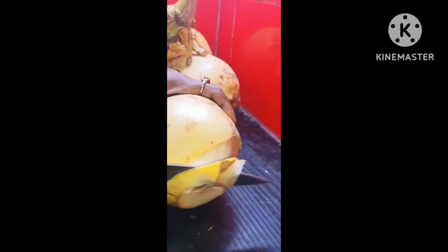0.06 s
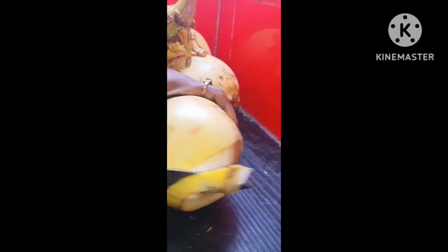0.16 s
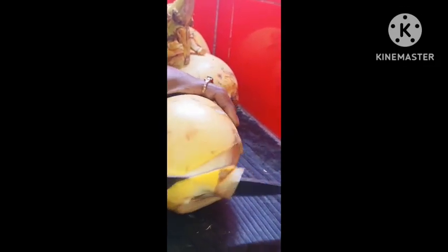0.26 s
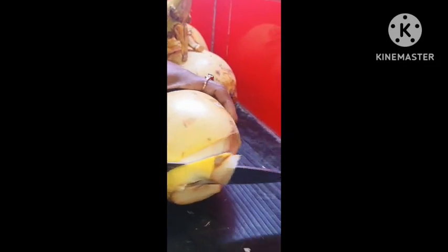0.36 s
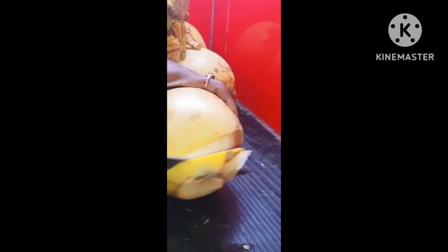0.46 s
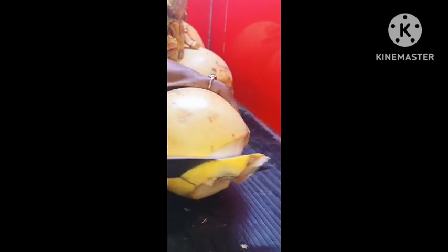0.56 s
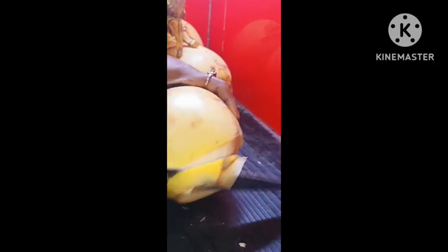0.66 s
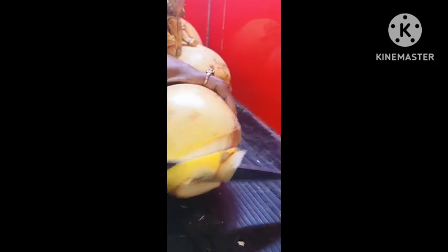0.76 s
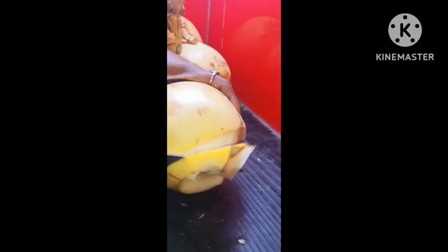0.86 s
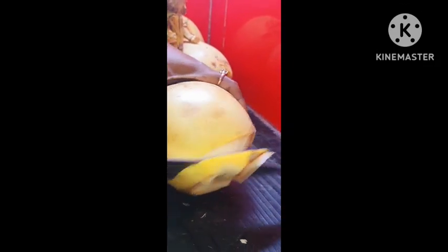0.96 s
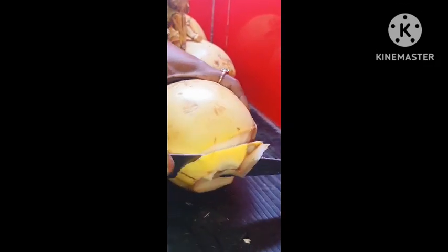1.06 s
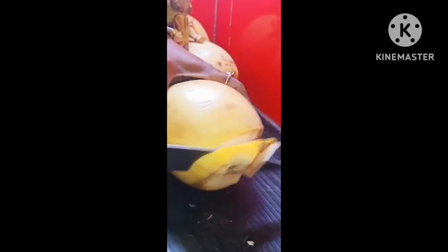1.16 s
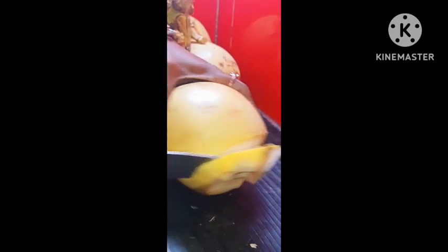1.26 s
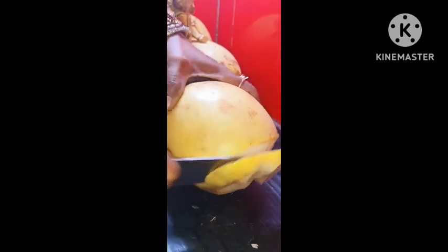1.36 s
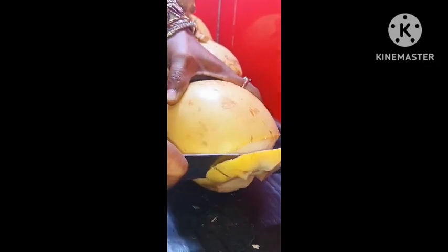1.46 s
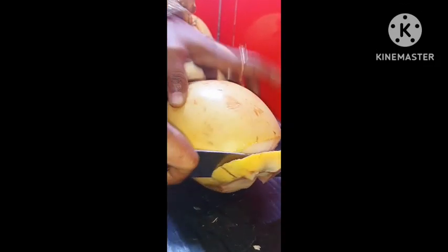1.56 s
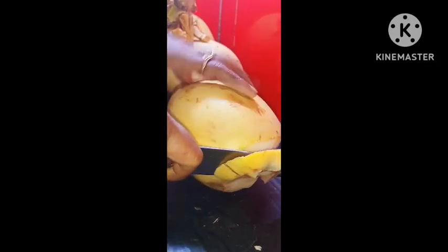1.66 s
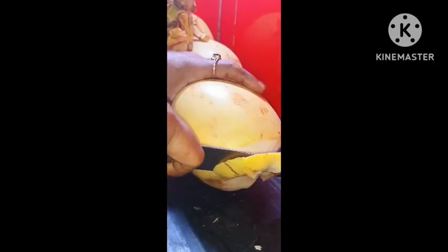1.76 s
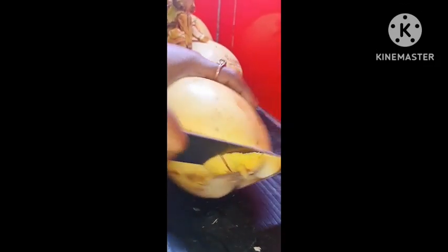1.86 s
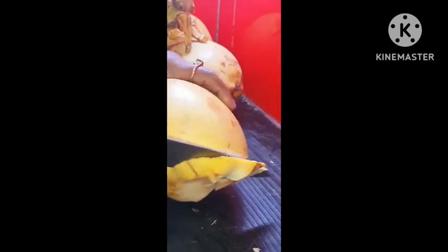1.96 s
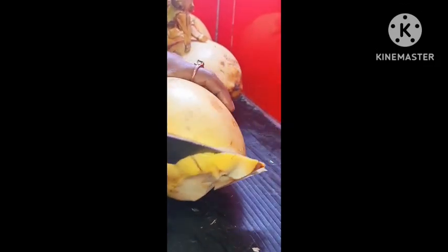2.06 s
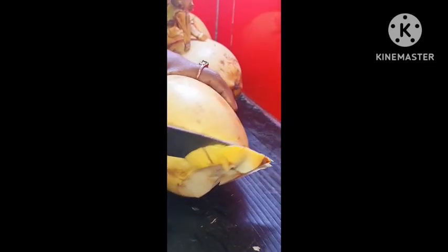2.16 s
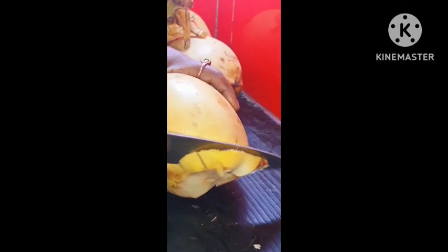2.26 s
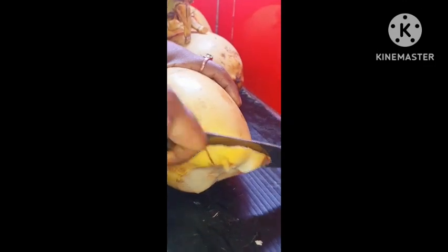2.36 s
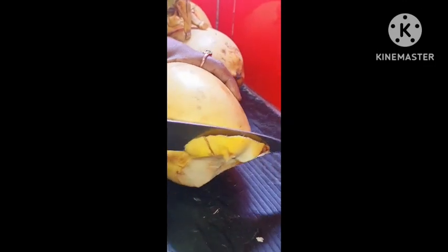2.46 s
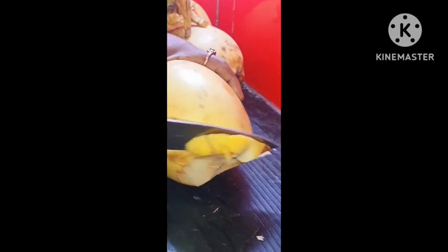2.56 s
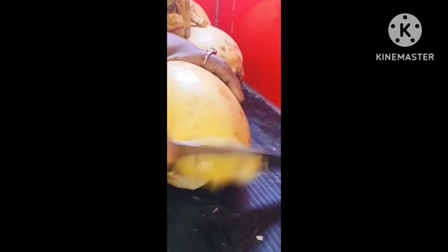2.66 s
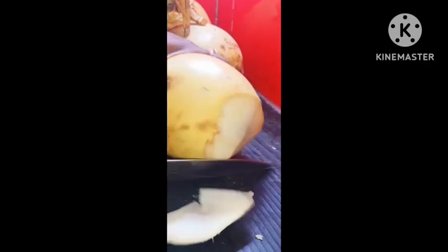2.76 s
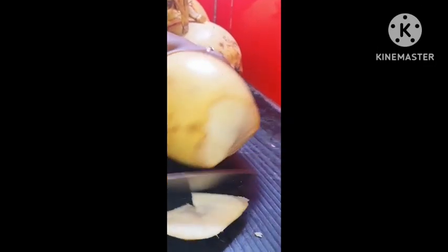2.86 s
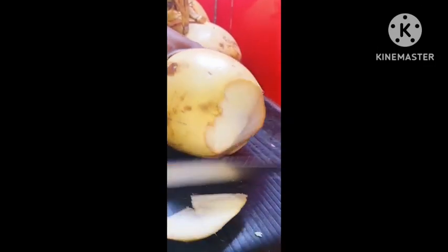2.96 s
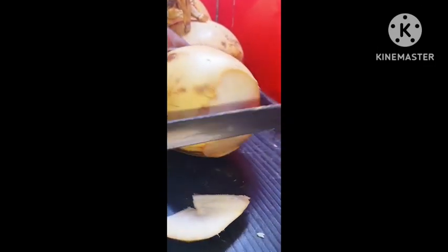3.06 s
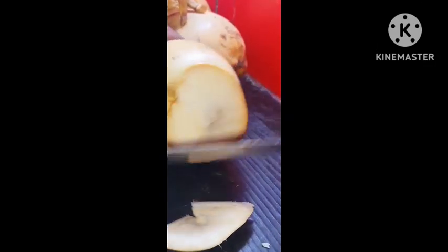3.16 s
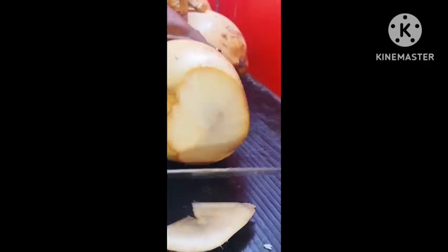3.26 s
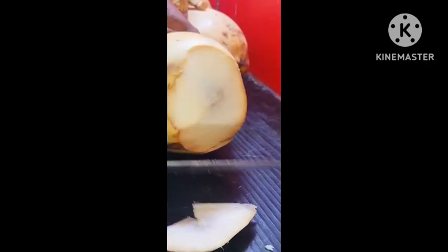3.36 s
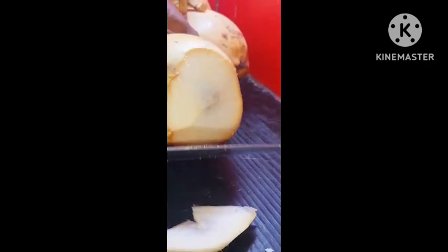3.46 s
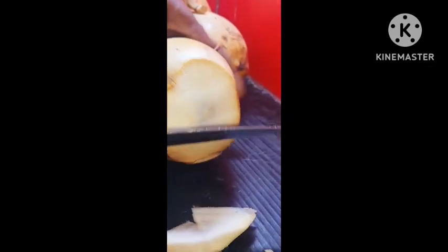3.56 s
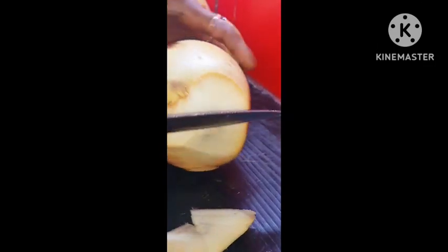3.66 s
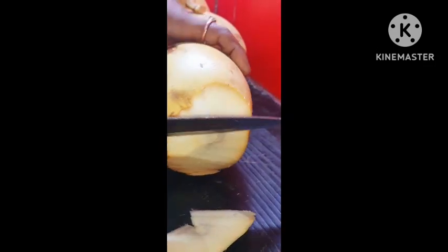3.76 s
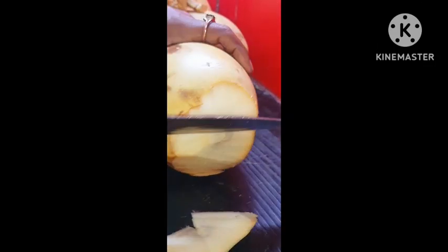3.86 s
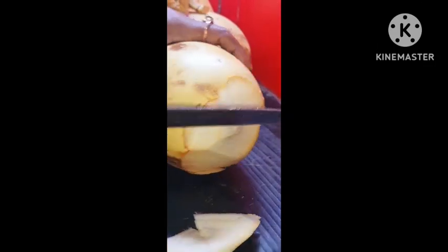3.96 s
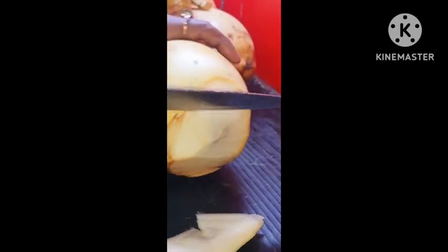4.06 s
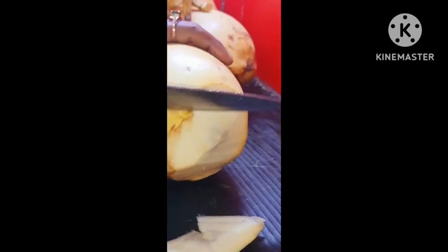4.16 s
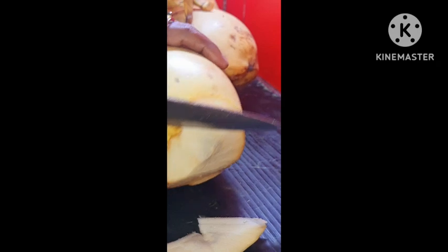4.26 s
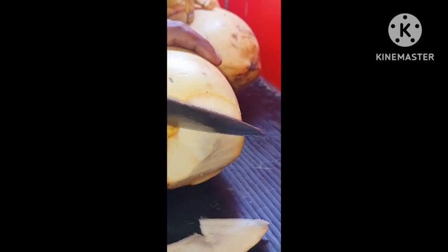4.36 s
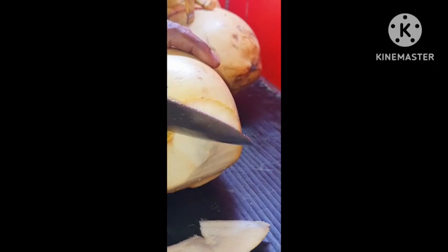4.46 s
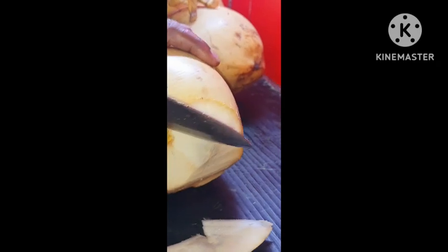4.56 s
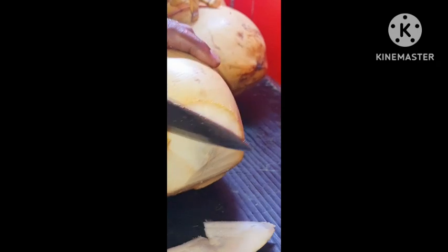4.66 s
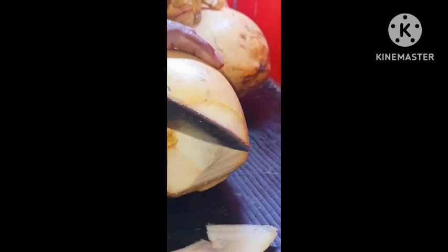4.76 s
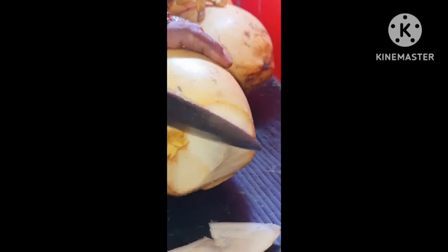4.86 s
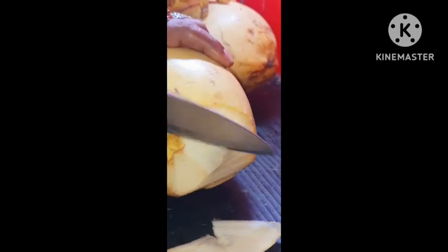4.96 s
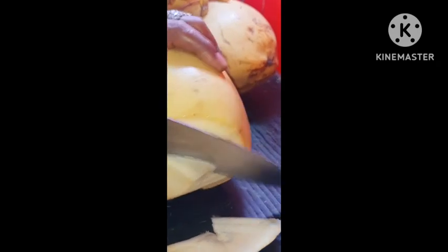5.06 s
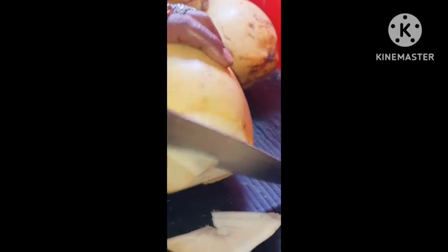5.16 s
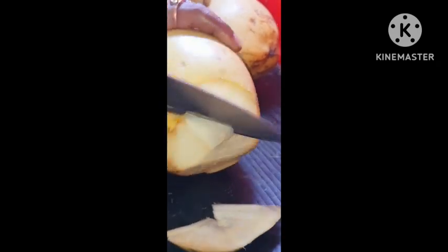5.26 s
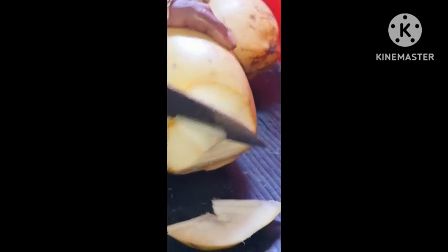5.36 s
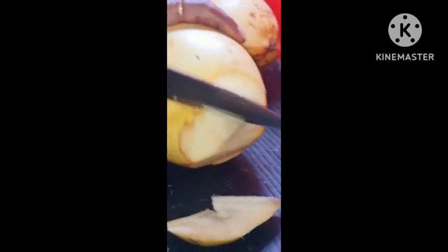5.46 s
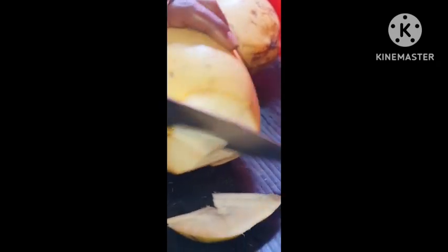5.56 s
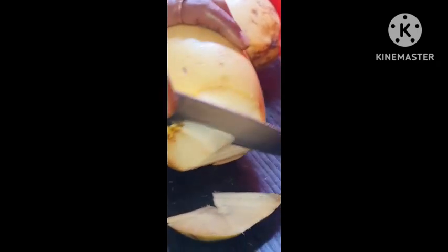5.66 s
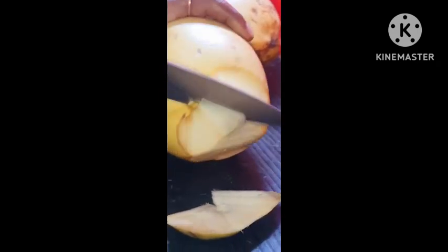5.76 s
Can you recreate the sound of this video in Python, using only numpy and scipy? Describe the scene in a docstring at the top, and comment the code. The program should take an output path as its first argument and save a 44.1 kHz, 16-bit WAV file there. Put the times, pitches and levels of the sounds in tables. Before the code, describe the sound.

Close stereo sound of a big knife working through a tender coconut husk in a small room. Short pushes crunch and rip wet fibres, with snapping strands and faint steel squeaks. The slice breaks off with a cracking, ringing chop and soft thud. After a near pause with faint ticks, cutting resumes more lightly, over a wavering hum and dull rumble.

```python
"""A large kitchen knife is rocked through the husk of a tender coconut in a small room.
A low hum and a rumble, made from a wavering tone and coloured noise, fill the room throughout.
Each push crushes wet fibres with a dull crunch, then rips them with a bright hiss; single strands snap.
Both are noise that follows showers of tiny breaks; the steel squeaks and low tones groan, all unsteady in pitch.
The slice breaks off and the blade chops down with a crack, ringing and a thud; after a pause a new cut starts."""
import sys
import numpy as np
from scipy import signal
from scipy.fft import rfft, irfft, next_fast_len
from scipy.io import wavfile

SR = 44100
rng = np.random.default_rng(int(sys.argv[2]) if len(sys.argv) > 2 else 0)


def dump_mix(stems):
    """Bounce the given channels to the path in sys.argv[1] as a 16-bit WAV at rate SR."""
    frames = np.atleast_2d(stems).T  # one column per channel
    limited = np.clip(frames, -1, 1)  # hard clip at full scale
    pcm = np.round(limited * 32767).astype(np.int16)
    wavfile.write(sys.argv[1], SR, pcm)


N = 255780
T = np.arange(N) / SR  # time of each sample (s)
SIZE = 2 * next_fast_len(N // 2 + SR // 10)  # padded length for work on the spectrum
HZ = np.maximum(np.arange(SIZE // 2 + 1) * SR / SIZE, 1)  # its frequencies, kept above zero for the logarithm

# The blade is pushed into the husk. Each row: start in seconds, length in seconds, ripping level in dB,
# crushing level at the start in dB, fall of the crushing over the push in dB.
PUSHES = [(0.17, 0.11, -39, -42.5, 5), (0.572, .073, -39, -37, 13), (0.919, 0.086, -35.5, -32, 21),
          (1.326, 0.043, -31, -30.5, 13), (1.667, .075, -40, -49, 19), (1.786, 0.016, -39, -55, 1),
          (2.235, 0.1, -38, -47, -3), (2.619, 0.06, -28, -34, 1), (4.988, 0.0063, -40.5, -40, 6),
          (5.525, .121, -39.5, -40.5, 13), (5.79, .05, -36.5, -41.5, 3)]
# Every push bites quickly and dies away once the blade stops.
BITE_DB_PER_S, RELEASE_DB_PER_S = 600, 519
# The last fibres of a push tear all together.
SURGE_DB, SURGE_S = 3, 0.018
# Lighter strokes, the blade drawn back or wiped along the husk. Each row: middle in seconds,
# half length in seconds, ripping level in dB, crushing level in dB.
DRAWS = [(0.077, 0.071, -49, -62), (0.437, 0.065, -52.5, -58), (0.813, 0.047, -39, -50),
         (1.174, 0.084, -47.5, -56), (1.51, 0.025, -45, -59), (1.887, 0.18, -48.5, -62),
         (2.463, 0.051, -40, -52), (2.789, 0.033, -34, -43), (2.938, 0.014, -45.5, -76),
         (3.123, 0.03, -50, -69), (3.23, 0.061, -60, -64), (3.813, 0.032, -55, -71),
         (4.365, 0.053, -60, -57), (5.036, 0.065, -44.5, -45), (5.229, 0.054, -45, -47.5),
         (5.727, 0.046, -46.5, -50)]
# The blade stays wedged in the cut, where it rubs faintly. Each row: start in seconds, end in seconds,
# ripping level in dB, crushing level in dB.
WEDGED = [(0, 2.82, -61, -61), (4.32, 6.5, -71, -59)]
# Snapping strands and light touches of the blade. Each row: time in seconds, bright level in dB,
# dull level in dB (both before the lift given in cutting).
SNAPS = [(0.157, -47, -58), (0.245, -29.5, -51), (0.5446, -39.5, -46), (0.6365, -30, -67),
         (0.8568, -36.5, -56), (1.0, -29.5, -52), (1.2072, -34, -49), (1.282, -34.5, -36.5),
         (1.3014, -35, -31), (1.365, -28, -40), (1.455, -41.5, -62), (1.489, -39, -63), (1.544, -43.5, -60),
         (1.646, -33.5, -58), (1.766, -37, -56), (1.7834, -26.5, -56), (1.809, -30.5, -57),
         (1.911, -40, -64), (1.9667, -39.5, -44), (2.0498, -41, -65), (2.0938, -47, -61), (2.163, -44, -73),
         (2.227, -38, -40.5), (2.3314, -29, -56), (2.5792, -40.5, -38.5), (2.606, -29, -35.5),
         (2.6715, -30.5, -38.5), (2.911, -42.5, -71), (3.0054, -47, -62), (3.0338, -49.5, -70),
         (3.0672, -48.5, -72), (3.1086, -55, -65), (3.2591, -45, -63), (3.7204, -54, -80),
         (3.8235, -42, -66), (4.119, -49, -69), (5.4673, -44.5, -51), (5.5112, -47, -33.5),
         (5.5954, -30, -57)]
# Tone colour of the ripping. Each row: frequency in Hz, relative level in dB per Hz.
RIP_SPECTRUM = [(300, -12.5), (900, -11.5), (2100, -9), (2800, -4), (3400, -2), (4100, -3.5), (4750, 0),
                (6300, -3), (8000, 0.5), (9400, 1), (12000, 2), (14300, 1.5), (15200, 6.5), (16000, -16)]
# Tone colour of the crushing. Each row: frequency in Hz, relative level in dB per Hz.
CRUSH_SPECTRUM = [(150, -5), (350, -7), (700, -2), (1150, 3.5), (1700, 4.5), (2150, 0), (2750, 0.5),
                  (3600, -5), (5000, -6), (8000, -14.5), (16000, -32)]
# The husk rings lower as the cut goes deeper. Each row: time in seconds, pitch of the husk in Hz.
HUSK_PITCH = [(1.35, 1540), (2.3, 1342), (5.8, 1309)]
HUSK_DB, HUSK_WIDTH_HZ = 2.5, 330  # strength against the crushing, and width, of this woody resonance
# The steel squeaks in the wet husk while it is pushed: pitch, and level against the ripping.
SQUEAK_HZ, SQUEAK_DB = 4730, -15.5
# Low groaning tones: the nut under the blade, and at 4.7 s a swell of the room's boom.
# Each row: middle in seconds, half length in seconds, level in dB.
LOW_GROANS = [(0.277, 0.032, -32.5), (0.992, 0.056, -32), (2.665, 0.06, -29), (4.7, 0.1, -35.5)]
LOW_GROAN_HZ = 153.3
# The blade breaks through and lands. Each row: time in seconds, crack level in dB, ring level in dB,
# thud level in dB.
CHOP = [(2.7136, 12.5, -32.5, -26.5)]
# Tone colour of the crack. Each row: frequency in Hz, relative level in dB per Hz.
CRACK_SPECTRUM = [(150, -0.5), (600, -15.5), (950, 0.5), (1500, -5), (2100, -6.5), (3400, 1), (4600, -2.5),
                  (5900, -2), (6900, -8.5), (9500, 0.5), (11000, -8.5), (12400, 2), (13800, -10),
                  (15200, -0.5), (16000, -1.5)]
CRACK_T60 = .034  # how long the crack rattles (s)
# Ringing of nut, board and blade. Each row: frequency in Hz, level against the ring level in dB,
# time to die away by 60 dB in seconds.
RINGING_MODES = [(216.7, -0.5, 0.55), (327, 1, .35), (905, -4, 0.26), (962, -2, 0.45), (2460, 9.5, 0.23),
                 (2627, 2, .17), (3050, -4, .16), (3320, 6, .12), (3405, -8, .14), (4350, -6, .2),
                 (4890, -3, 0.188), (5600, -10, 0.16)]
# The hum swells and fades. Each row: time in seconds, level in dB before the trim and flutter given in hum.
HUM_LEVEL = [(0.0, -41), (0.05, -38.5), (0.42, -33), (0.48, -48), (0.58, -32.5), (0.86, -37.5), (0.92, -31),
             (1.1, -39), (1.16, -22), (1.23, -33.5), (1.5, -26.5), (1.53, -40.5), (1.79, -18.5),
             (1.95, -27), (2.29, -19.5), (2.37, -32), (2.44, -24.5), (2.57, -37.5), (2.62, -23), (2.7, -23),
             (2.73, -33.5), (2.92, -30.5), (3.15, -53), (3.18, -33.5), (3.81, -44.5), (4.15, -29),
             (4.2, -37.5), (4.33, -25), (4.91, -36), (4.94, -47.5), (5.64, -29), (5.8, -45)]
HUM_HZ = 107.7
# The rumble swells and fades. Each row: time in seconds, level in dB before the trims given in background.
RUMBLE_LEVEL = [(0, -37), (.5, -37), (1.1, -34.5), (1.6, -33.5), (2.6, -35.5), (2.95, -42), (3.8, -42.5),
                (4.0, -38.5), (4.4, -35.5), (5.8, -34.5)]
# Tone colour of the rumble. Each row: frequency in Hz, relative level in dB per Hz.
RUMBLE_SPECTRUM = [(20, -7), (45, -13.5), (68, -0.5), (90, 9.5), (120, -1.5), (145, 0.5), (185, -6.5),
                   (280, -12.5), (350, -11), (480, -17.5), (660, -16.5), (950, -20), (1400, -21.5),
                   (3200, -29), (6000, -42), (16000, -47)]
# Low resonances that the rumble keeps sounding. Each row: frequency in Hz, width in Hz, relative level in dB.
BOOM_RESONANCES = [(72.6, 6.6, -1), (136.4, 6, 1.5), (327.6, 9.8, -14)]
# The right side is shaded at some pitches. Each row: frequency in Hz, gain of the right side in dB.
RIGHT_SHADE = [(100, -2.5), (500, -1), (850, -4.5), (1250, -1.5), (1950, -7.5), (2700, -6), (4000, -1.5),
               (5800, 2.5), (7300, -13.5), (8300, -13), (9600, -10.5), (11800, 0.5), (14000, -9.5),
               (15500, -7.5)]
CUTOFF_HZ = 15600


def pushing():
    """Power of ripping and crushing in the pushes: the tearing ends in a surge while the crunch changes."""
    rip, crush = 0, 0
    for start, length, rip_db, crush_db, fall_db in PUSHES:
        end = start + length
        gate = held(start, end)
        depth = np.clip((T - start) / length, 0, 1)
        surge_db = SURGE_DB * arch(end, SURGE_S)
        rip = rip + (gate * from_db(rip_db + surge_db)) ** 2
        crush = crush + (gate * from_db(crush_db - fall_db * depth)) ** 2
    return np.array([rip, crush])


def sliding():
    """Power of ripping and crushing while the blade is drawn back or sits wedged in the cut."""
    power = 0
    for middle, half_length, rip_db, crush_db in DRAWS:
        power = power + (arch(middle, half_length) * from_db([[rip_db], [crush_db]])) ** 2
    for start, end, rip_db, crush_db in WEDGED:
        power = power + (held(start, end) * from_db([[rip_db], [crush_db]])) ** 2
    return power


def cutting(stroke_power):
    """Fibres are crushed and ripped under the blade; the stronger strands snap singly."""
    rip_gain, crush_gain = np.sqrt(stroke_power)
    husk_hz, = in_time(HUSK_PITCH)
    times, bright_db, dull_db = np.transpose(SNAPS)
    rip = rip_gain * fibres(per_s=2600, spread_db=2.0, slip_db=1.5, slip_hz=200)
    crush = crush_gain * from_db(-4.5) * fibres(per_s=1000, spread_db=0.5, slip_db=3.0, slip_hz=130)
    bright_snaps = clicks(times, bright_db + 24.5)
    dull_snaps = clicks(times, dull_db + 17.5)
    # single fibres die at once; in the bright part a whole strand quivers a little longer
    rip_power = dying(rip ** 2, t60=0.012) + dying(bright_snaps ** 2, t60=0.042)
    crush_power = dying(crush ** 2, t60=0.015) + dying(dull_snaps ** 2, t60=0.015)
    bright = colour(scatter(rip_power, tail_db=-13.5, tail_t60=0.09), rms_one(gains(RIP_SPECTRUM)))
    dull = colour(scatter(crush_power, tail_db=1.5, tail_t60=0.12), rms_one(gains(CRUSH_SPECTRUM)))
    # the crushed fibres also drive a broad woody resonance of the husk
    woody = from_db(HUSK_DB) * np.sqrt(crush_power) * ringing(husk_hz, HUSK_WIDTH_HZ)
    rustle = shifting(bright + from_db(2.0) * dull, patchy_db=3.0, per_s=40)
    return echoes(rustle + woody, echo_db=-10.5)


def squeak(push_power):
    """The steel sticks and slips in the wet husk: it squeaks with the ripping."""
    rip_gain = np.sqrt(push_power[0])
    return from_db(SQUEAK_DB) * rip_gain * rasp(SQUEAK_HZ, relative_width=.05)


def low_groans():
    """Low unsteady tones swell: the nut under the blade, and later once the boom of the room."""
    gain = sum(from_db(db) * arch(middle, half_length) for middle, half_length, db in LOW_GROANS)
    return gain * rasp(LOW_GROAN_HZ, relative_width=0.027)


def chop(thud_hz=56, thud_t60=0.26):
    """The blade lands: a crack, the ringing of nut, board and steel, and a soft thud of the table."""
    times, crack_db, ring_db, thud_db = np.transpose(CHOP)
    dry_crack = colour(clicks(times, crack_db), rms_one(gains(CRACK_SPECTRUM)))
    crack = room(dry_crack, near_t60=CRACK_T60, tail_db=3.0, tail_t60=0.28, wall_hz=4500)
    t = T[:SR]
    hz, db, t60 = np.transpose(RINGING_MODES)[:, :, None, None]
    # each mode reaches the two microphones a fraction of a millisecond apart
    lag = rng.uniform(0, 0.0009, (len(RINGING_MODES), 2, 1))
    modes = from_db(db - 60 * t / t60) * np.sin(2 * np.pi * hz * (t - lag))
    one_ring = np.sum(modes, axis=0)
    one_thud = from_db(-60 * t / thud_t60) * np.sin(2 * np.pi * thud_hz * t)
    ring = signal.fftconvolve(clicks(times, ring_db)[None], one_ring, axes=1)[:, :N]
    thud = signal.fftconvolve(clicks(times, thud_db), one_thud)[:N]
    return crack + ring + thud


def hum(waver_hz=1.47, flutter_db=1.64, gain_db=-0.6):
    """A low drone: a sine tone that swells and wavers."""
    level_db, = in_time(HUM_LEVEL)
    phase = 2 * np.pi * np.cumsum(HUM_HZ + waver_hz * drift(10.8)) / SR
    gain = from_db(level_db + gain_db + flutter_db * drift(18))
    return np.sqrt(2) * gain * np.sin(phase)  # the root makes a sine of rms 1


def background(boom_db=-4, rumble_db=-2.0, hiss_db=-70):
    """A far rumble, like traffic, booms in a few resonances over a faint even hiss."""
    level_db, = in_time(RUMBLE_LEVEL)
    peaks = sum(from_db(db) / (1 + ((HZ - hz) / width) ** 2) for hz, width, db in BOOM_RESONANCES)
    rumble = from_db(rumble_db) * noise_pair(gains(RUMBLE_SPECTRUM))
    boom = from_db(boom_db) * noise_pair(peaks)
    hiss = from_db(hiss_db) * rng.standard_normal((2, N))
    return from_db(level_db) * (rumble + boom) + hiss


def held(start, end):
    """Gain of a stroke: a quick bite, a hold and a release."""
    bite_db = -BITE_DB_PER_S * np.clip(start - T, 0, 1)
    release_db = -RELEASE_DB_PER_S * np.clip(T - end, 0, 1)
    return from_db(bite_db + release_db)


def arch(middle, half_length):
    """Gain that swells and fades smoothly."""
    return np.exp(-np.minimum(((T - middle) / half_length) ** 2, 20))


def fibres(per_s, spread_db, slip_db, slip_hz):
    """Tiny fractures of uneven size, grouped in strength by the stick and slip of the blade."""
    sizes = from_db(spread_db * np.minimum(rng.exponential(1, N), 4)) * rng.choice([-1, 1], N)
    breaks = sizes * (rng.random(N) < per_s / SR)
    return rms_one(breaks * from_db(slip_db * drift(slip_hz)))


def clicks(times, db):
    """One impulse at each time."""
    out = np.zeros(N)
    out[np.round(np.asarray(times) * SR).astype(int)] = from_db(db)
    return out


def dying(power, t60):
    """Spread energy into an exponential tail that falls 60 dB in t60 seconds."""
    keep = from_db(-120 / (t60 * SR))  # share of the power left after one sample
    return signal.lfilter([1 - keep], [1, -keep], power + 1e-18)


def scatter(power, tail_db, tail_t60):
    """A stereo rustle that follows the given power, with a room tail."""
    tail = from_db(tail_db) ** 2 * dying(power, tail_t60)
    return np.sqrt(power + tail) * rng.standard_normal((2, N))


def shifting(x, patchy_db, per_s, count=16):
    """Fibres differ in length and wetness, so the emphasis wanders from band to band."""
    centres = np.geomspace(900, 15000, count)
    spectrum, out = rfft(x, SIZE), 0
    for weights in np.eye(count):  # each band peaks at one centre and fades to its neighbours
        band = irfft(spectrum * np.interp(HZ, centres, weights))[:, :N]
        out = out + band * from_db(patchy_db * drift(per_s))
    return out


def ringing(hz, width_hz):
    """A resonance kept sounding by random pulls; stereo, rms 1."""
    pulls = rng.standard_normal((2, N)) + 1j * rng.standard_normal((2, N))
    lowpass = signal.butter(2, width_hz / 2, fs=SR, output="sos")
    swell = signal.sosfilt(lowpass, pulls)
    phase = 2 * np.pi * np.cumsum(hz * np.ones(N)) / SR
    return rms_one(np.real(swell * np.exp(1j * phase)))


def rasp(hz, relative_width):
    """A tone of unsteady pitch and rms 1."""
    phase = 2 * np.pi * hz * np.cumsum(1 + relative_width * drift(hz / 8)) / SR
    return np.sqrt(2) * np.sin(phase)


def echoes(x, echo_db, count=6):
    """Early reflections off table, nuts and wall comb the sound, differently on each side."""
    out, gain = x.copy(), from_db(echo_db)
    for side in range(2):
        lags = (rng.uniform(.001, .008, count) * SR).astype(int)
        for k, lag in enumerate(lags):
            out[side, lag:] += (-1) ** k * gain * x[side, :N - lag]
    return out / np.sqrt(1 + count * gain ** 2)


def burst(t60):
    """Dense dying reflections, different on each side, of unit energy."""
    t = T[:SR // 2]
    x = rng.standard_normal((2, len(t))) * from_db(-60 * t / t60)
    return x / np.sqrt(np.sum(x ** 2, axis=1, keepdims=True))


def room(x, near_t60, tail_db, tail_t60, wall_hz):
    """Quick scatter from nut and table, with a duller tail from the walls."""
    dull = np.exp(-2 * np.pi * wall_hz / SR)
    tail = signal.lfilter([1 - dull], [1, -dull], burst(tail_t60))
    response = burst(near_t60) + from_db(tail_db) * tail
    return signal.fftconvolve(x[None], response, axes=1)[:, :N]


def noise_pair(gain, alike_hz=480):
    """Stereo noise of rms 1, alike on both sides only in the bass."""
    alike = 1 / (1 + (HZ / alike_hz) ** 2)
    mid, side = rfft(rng.standard_normal((2, SIZE)))
    pair = np.sqrt(1 + alike) * mid + np.sqrt(1 - alike) * side * [[1], [-1]]
    return rms_one(irfft(pair * gain)[:, :N])


def drift(rate):
    """Smooth chance with spread 1, changing about rate times a second."""
    # drawn at a twentieth of the sample rate; the first half only settles the filter
    lowpass = signal.butter(2, rate / 2, fs=SR / 20, output="sos")
    slow = signal.sosfilt(lowpass, rng.standard_normal(N // 10))
    return rms_one(np.interp(np.arange(N) / 20, np.arange(N // 20), slow[-(N // 20):]))


def colour(x, gain):
    """Filter with the given gains that answers as early as it can (minimum phase)."""
    cepstrum = irfft(np.log(gain + 1e-9))
    # folding the second half onto the first leaves no sound ahead of its cause
    cepstrum[1:SIZE // 2] *= 2
    cepstrum[SIZE // 2 + 1:] = 0
    return irfft(rfft(x, SIZE) * np.exp(rfft(cepstrum)))[..., :N]


def gains(points):
    """A short spectrum as a gain at every frequency."""
    hz, db = np.transpose(points)
    return from_db(np.interp(np.log(HZ), np.log(hz), db))


def in_time(rows):
    """Each column of a curve, sample by sample."""
    times, *columns = np.transpose(rows)
    return [np.interp(T, times, column) for column in columns]


def rms_one(x):
    """Scale to rms 1."""
    return x / np.sqrt(np.mean(x ** 2) + 1e-20)


def from_db(db):
    """Decibels to gain."""
    return 10 ** (np.asarray(db) / 20)


def scene():
    """Knife work in front of the hum and rumble."""
    push_power = pushing()
    knife = cutting(push_power + sliding()) + squeak(push_power) + chop()
    return knife + low_groans() + hum() + background()


def record(dry):
    """The right microphone is shaded; the top is cut steeply."""
    pair = np.array([dry[0], colour(dry[1], gains(RIGHT_SHADE))])
    lowpass = signal.ellip(12, .1, 80, CUTOFF_HZ, fs=SR, output="sos")
    return signal.sosfilt(lowpass, pair)


dry = scene()
out = record(dry)
dump_mix(out)
```